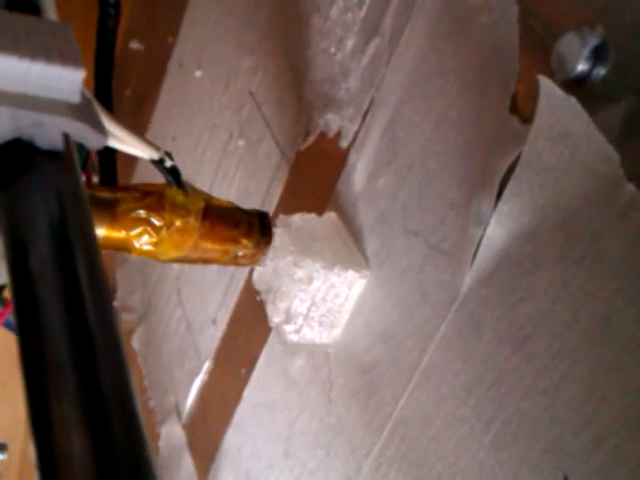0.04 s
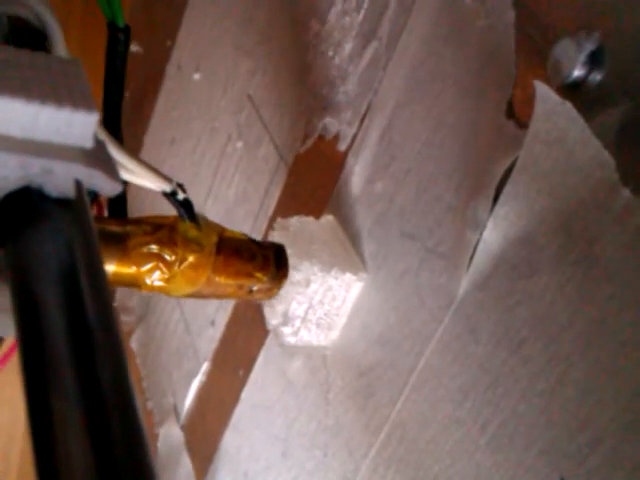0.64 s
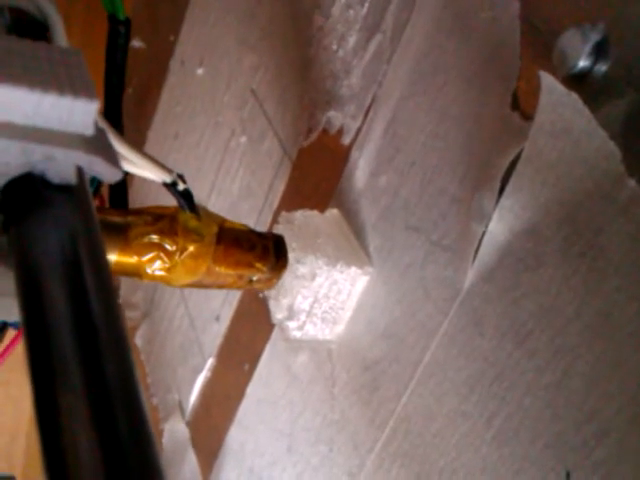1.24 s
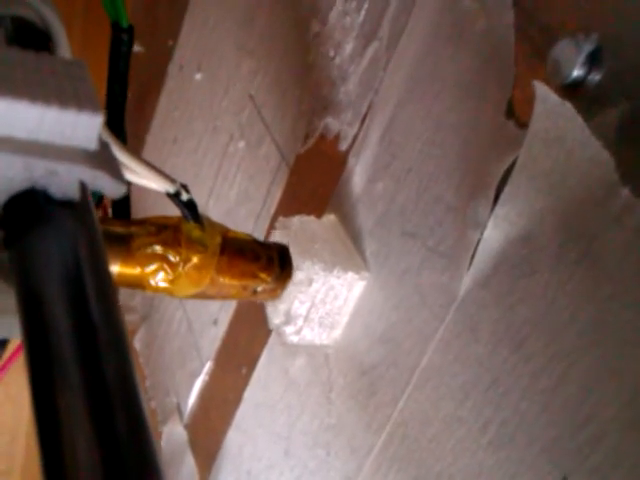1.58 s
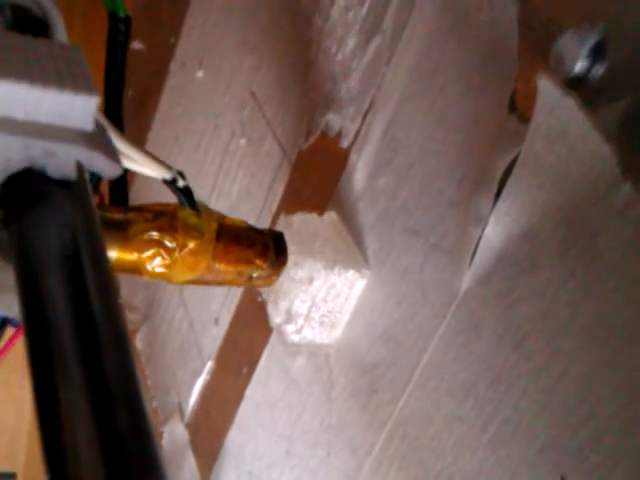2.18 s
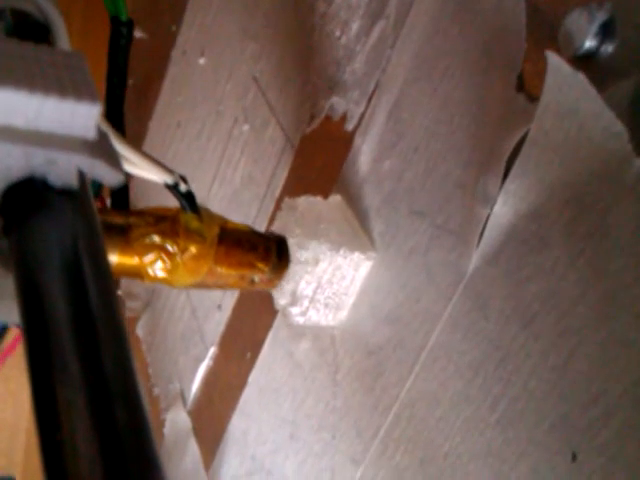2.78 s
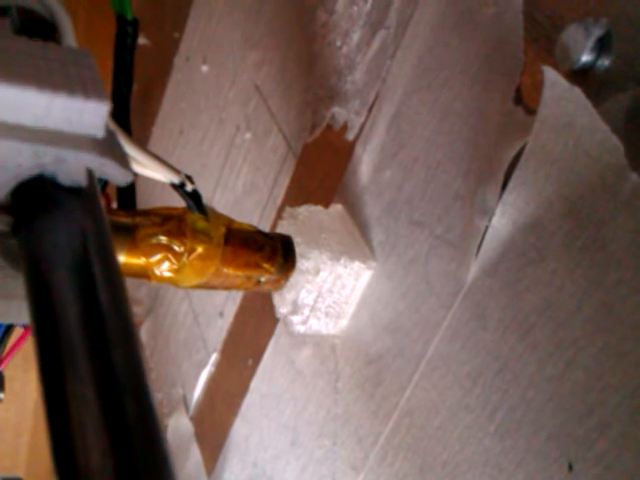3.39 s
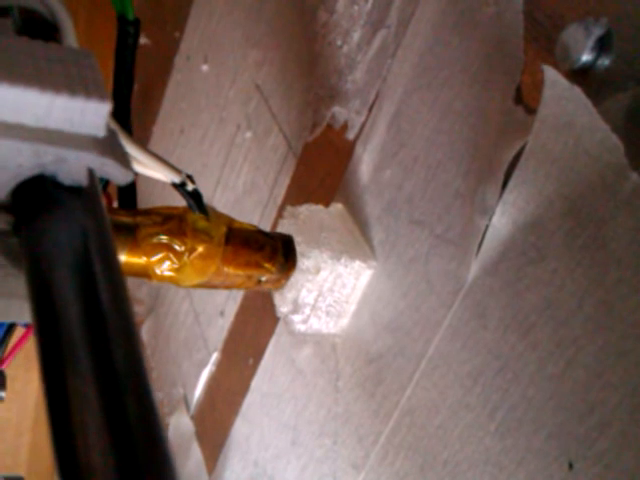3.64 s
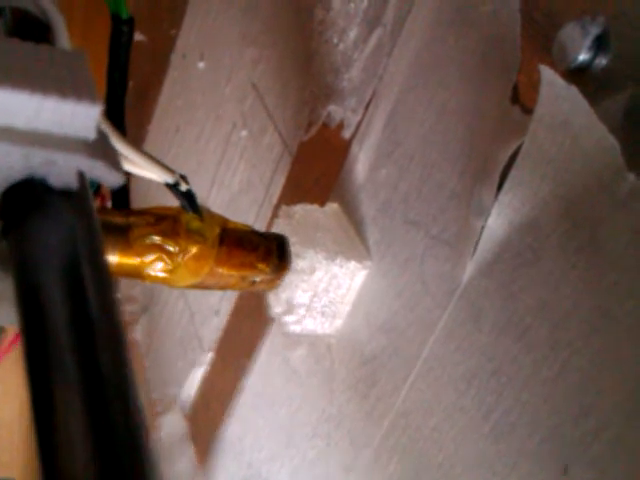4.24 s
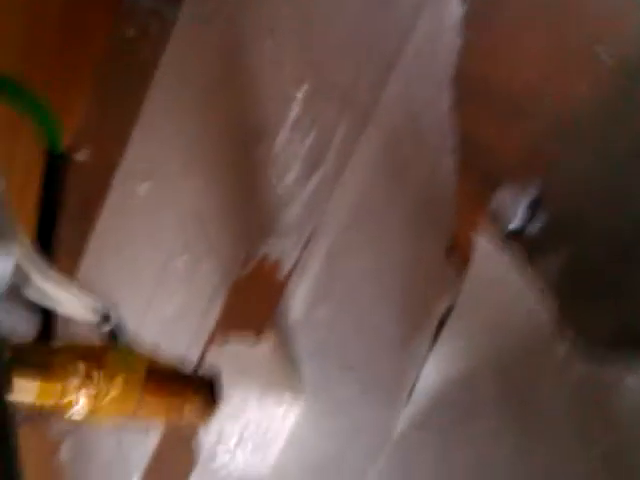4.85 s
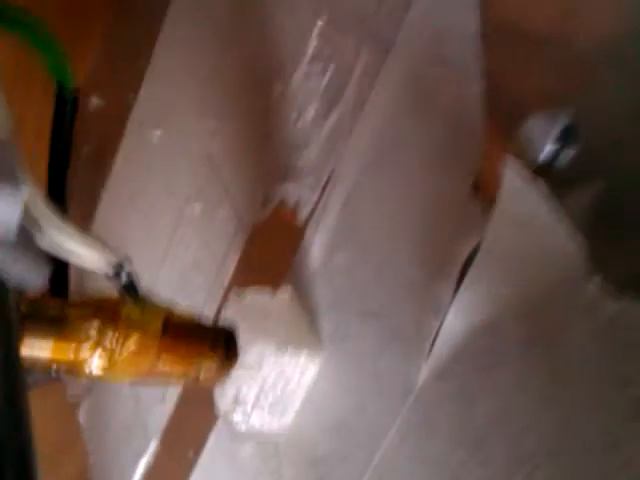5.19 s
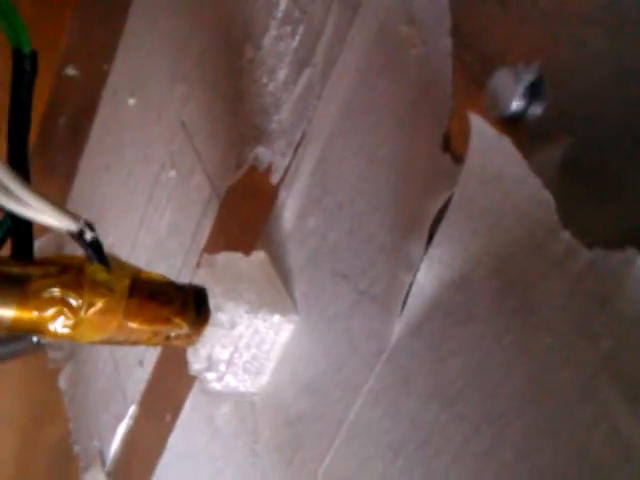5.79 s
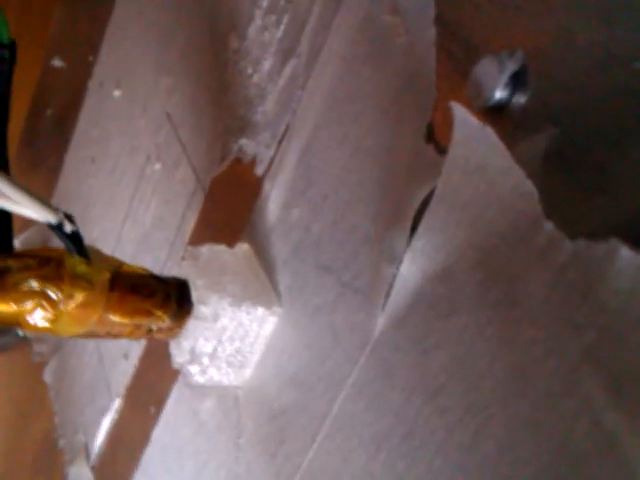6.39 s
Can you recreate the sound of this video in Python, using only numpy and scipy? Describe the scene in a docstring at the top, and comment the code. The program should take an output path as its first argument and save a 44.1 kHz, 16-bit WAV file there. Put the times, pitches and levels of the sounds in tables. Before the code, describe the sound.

Stepper motors pulse and buzz as a 3D printer works, then halt; a hand knocks and rubs the microphone over faint fan hum.

```python
"""Two stepper motors whine and growl in short, jerky moves: a home-built 3D printer filling in a small cube,
heard from beside the nozzle. Every step knocks the frame, the rotors swing about their detents, the bed
rocks, the bearings chatter and a loose part buzzes. The motors stop and leave a fan's hum; then a hand
knocks and rubs the camera as it shifts it, and the hardest knocks clip."""
import sys
import numpy as np
from scipy import signal
from scipy.fft import rfft, irfft, next_fast_len
from scipy.io import wavfile
from scipy.ndimage import uniform_filter1d

SR = 44100
rng = np.random.default_rng(int(sys.argv[2]) if len(sys.argv) > 2 else 0)


def waveform_to_disk(signal):
    """Save audio, clipped to [-1, 1], as 16-bit WAV at the path in sys.argv[1]."""
    frames = np.transpose(np.atleast_2d(signal))
    scaled = np.clip(frames, -1, 1) * 32767
    samples = np.round(scaled).astype(np.int16)
    wavfile.write(sys.argv[1], SR, samples)


N = 282681
TIME = np.arange(N) / SR

# Moves of the print head. Levels in all cue tables are set ahead of each layer's own gain and filters.
# (start [s], end [s], cross-axis step rate [Hz], whining harmonic [number], step force [dB],
#  rotor pitch [Hz], rotor level [dB], bed level [dB], whine level [dB], rasp level [dB], zing level [dB])
HEAD_MOVES = [(0, 0.055, 96.95, 5, -39, 274, -34, -38, -46, -50.5, -57),
              (0.053, 0.099, 97.43, 5, -38, 258, -27, -45, -39, -87, -85),
              (0.1, 0.147, 86.95, 5, -41.5, 286, -31.5, -46, -38.5, -55.5, -62),
              (0.189, 0.249, 156.7, 3, -40, 274, -34.5, -30.5, -40, -52, -53),
              (0.259, 0.314, 156, 3, -39, 286.7, -43, -42, -35, -51, -56),
              (0.296, 0.357, 157.5, 3, -39, 274, -28, -50, -33, -57, -60),
              (0.348, 0.439, 158.6, 3, -41.5, 281.2, -33.5, -33, -39.5, -53.5, -55),
              (0.552, 0.599, 86.3, 5, -40, 255.9, -24, -27.5, -32, -55, -70),
              (0.606, 0.704, 81.83, 6, -36.5, 269.9, -25, -26, -42, -48.5, -57),
              (0.713, 0.808, 105.5, 4, -39, 280.5, -19.5, -39, -52, -86, -72),
              (0.811, 0.898, 81.87, 6, -38.5, 260, -22.5, -24.5, -59, -58.5, -57),
              (0.914, 0.951, 82.65, 6, -39, 270.8, -19.5, -29.5, -35, -57, -83),
              (1.011, 1.04, 86, 5, -42, 262.8, -26.5, -23, -34.5, -57.5, -75),
              (1.347, 1.431, 87.72, 5, -40, 283, -22, -39, -49, -65, -66),
              (1.424, 1.529, 81.96, 6, -37, 275.8, -24, -26.5, -42.5, -48.5, -60),
              (1.525, 1.567, 82.2, 6, -37.5, 268.4, -22, -28, -42, -50.5, -56),
              (1.622, 1.674, 126.9, 3, -39, 277.2, -25, -28, -28.5, -61, -68),
              (1.679, 1.72, 129.2, 3, -38.5, 287.7, -23.5, -28.5, -26, -79, -83),
              (1.724, 1.775, 127.8, 3, -38.5, 282.2, -24, -27.5, -37.5, -56.5, -62),
              (1.775, 1.85, 81.6, 6, -38.5, 277, -21.5, -33.5, -45, -52, -56),
              (1.854, 1.912, 87.35, 5, -41, 266, -25, -35.5, -47, -64, -62),
              (1.913, 1.985, 82.97, 6, -38, 276.3, -26, -31.5, -38, -60, -74),
              (2.046, 2.082, 86.6, 5, -45, 262.8, -26, -24.5, -34.5, -64.5, -78),
              (2.18, 2.282, 96.84, 5, -39.5, 254.1, -25, -38, -33.5, -69, -67.5),
              (2.28, 2.335, 98.25, 5, -39, 268.7, -26.5, -30.5, -40.5, -55, -60),
              (2.336, 2.502, 81.26, 6, -38, 269.6, -26, -33, -41.5, -51.5, -67),
              (2.504, 2.601, 128.1, 3, -37.5, 272.7, -29.5, -32.5, -29.5, -61.5, -63),
              (2.6, 2.694, 127.9, 3, -38, 275.2, -25, -31.5, -27.5, -63, -74),
              (2.739, 2.823, 143.9, 3, -38, 277.9, -23.5, -60, -29, -52, -57),
              (2.823, 2.934, 81.24, 6, -37.5, 267.4, -24, -35, -37, -52, -58),
              (2.937, 3.033, 82.13, 6, -38.5, 275.7, -28, -28, -41.5, -62, -80),
              (3.099, 3.159, 86.8, 5, -39.5, 275, -25, -28.5, -44, -60, -54.5),
              (3.272, 3.325, 86.46, 5, -41.5, 252.9, -29.5, -29, -47, -50.5, -64),
              (3.327, 3.404, 87.2, 5, -37.5, 266.8, -30, -33.5, -35, -52.5, -57.5),
              (3.404, 3.453, 87.3, 5, -43, 268.6, -34, -30.5, -57, -52.5, -65)]
LEAD_STEP_HZ, LEAD_DRIFT = 73.43, .015  # the leading axis: step rate, and its drift as a share


def printer():
    """The steps of two motors drive the whole machine, move by move."""
    (starts, ends, cross_hz, harmonic, force_db, rotor_hz,
     rotor_db, bed_db, whine_db, rasp_db, zing_db) = np.transpose(HEAD_MOVES)
    move = np.searchsorted(starts[1:], TIME)
    zigzag, moving = strokes(starts, ends, move)
    lead, since_step = steps(LEAD_STEP_HZ * (1 + LEAD_DRIFT * walk(9)))
    cross, _ = steps(cross_hz[move])
    force = envelope(starts, ends, force_db, attack=.0043, t60=.0093) * braking(starts, ends)
    whine_gain = envelope(starts, ends, whine_db, attack=.015, t60=.1)
    rotor_gain = envelope(starts, ends, rotor_db, attack=.00073, t60=.29)
    bed_gain = envelope(starts, ends, bed_db, attack=.034, t60=.31)
    rasp_gain = envelope(starts, ends, rasp_db, attack=.0089, t60=.037)
    zing_gain = envelope(starts, ends, zing_db, attack=.02, t60=.14)

    body = frame_knocks(force, lead, cross)
    body += whine_gain * motor_whine(cross_hz[move], harmonic[move])
    body += force * carriage_song(cross_hz[move])
    body += rotor_gain * rotor_swing(zigzag, moving, rotor_hz[move])
    body += bed_gain * bed_rocking()
    grit, growl = bearing_shake(lead + cross, since_step)
    metal = pulley_rasp(grit + growl, zigzag, rasp_gain) + belt_sizzle(grit) + zing_gain * rod_zing()
    return body + metal + bearing_chatter(grit, growl, force, zigzag)


def steps(hz, jitter_cycles=.012, scatter_db=1.5):
    """One uneven impulse per step, and the seconds since the last step."""
    cycles = np.cumsum(hz) / SR + jitter_cycles * walk(70)
    fired = np.diff(np.floor(cycles), prepend=0) > 0
    impulses = fired * undb(scatter_db * rng.standard_normal(N))
    return unit(impulses - hz / SR), cycles % 1 / hz


def strokes(starts, ends, move, stroke_s=.051):
    """Speed of the head along its zigzag, -1 to 1, and whether it is still moving."""
    lengths = np.minimum(ends, np.append(starts[1:], np.inf)) - starts
    progress = np.clip((TIME - starts[move]) / lengths[move], 0, 1)
    count = np.maximum(np.round(lengths / stroke_s), 1)
    return np.sin(np.pi * count[move] * progress), progress < 1


def throb(zigzag, turn_db):
    """Gain that swells in mid-stroke and dips as the head slows at each turn."""
    return undb(turn_db) + (1 - undb(turn_db)) * abs(zigzag)


def braking(starts, ends, surge_db=3, early_s=.032, width_s=.0091, min_pause_s=.025):
    """Gain of the short surge of force as the head brakes before each stop."""
    stops = ends[np.append(starts[1:], np.inf) - ends > min_pause_s]
    return undb(surge_db * sum(np.exp(-((TIME - stop + early_s) / width_s) ** 2) for stop in stops))


# The frame's resonances: (frequency [Hz], t60 [s], level [dB])
FRAME_MODES = [(72.2, 0.38, 5), (206.6, 0.22, 9), (227.5, 0.93, 8.5), (246.7, 0.26, 18.5),
               (302.4, 0.17, 12), (374.3, 0.54, 2.5), (422, 0.25, -6.5), (496, 0.082, -14.5),
               (760, 0.29, -6), (800, 0.28, -8.5)]
# Tone of the panels' dense ringing: (frequency [Hz], level [dB])
PANEL_EQ = [(25, -35), (65, -13.5), (110, -9.5), (155, -8), (195, 8), (270, -0.5), (380, 4.5), (500, 5.5),
            (600, -3), (900, -17), (1250, -12), (2000, -24.5), (3000, -43.5), (6000, -64.5), (16000, -72.5)]


def frame_knocks(force, lead, cross):
    """Each step rings the frame and panels, and the whole machine shudders on the bench."""
    kicks = force * (lead + undb(-4.5) * cross)
    frame = undb(21.5) * ring(kicks, FRAME_MODES)
    panels = undb(18.5) * colour(diffuse(kicks, t60=.19), PANEL_EQ)
    shudder = noise([(15, -5.5), (35, -5), (70, 4), (110, 9.5), (160, -15.5), (300, -19.5), (2000, -77)])
    return frame + panels + undb(.5) * force * shudder


def motor_whine(step_hz, harmonic):
    """In each move one harmonic of the steps meets a resonance and sings out."""
    return undb(-1.25 + 2.5 * walk(50)) * tone(step_hz * harmonic, wander_hz=6.54, rate=55)


def carriage_song(step_hz, resonance_hz=792):
    """The carriage sings along on the step harmonic nearest its resonance."""
    hz = step_hz * np.round(resonance_hz / step_hz)
    return undb(-13 + 4.6 * walk(30.33)) * tone(hz, wander_hz=4.5, rate=45)


ROTOR_REST_HZ = 281.3  # pitch of the swing without load


def rotor_swing(zigzag, moving, swing_hz, sag_hz=12.1, direction_hz=3.99, lag_s=.0062):
    """The rotor overshoots each detent: a tone that swells and sags under load in mid-stroke."""
    loaded_hz = swing_hz - sag_hz * (abs(zigzag) - np.pi / 4) + direction_hz * zigzag
    lag = np.exp(-1 / (lag_s * SR))
    hz = ROTOR_REST_HZ + signal.lfilter([1 - lag], [1, -lag], moving * (loaded_hz - ROTOR_REST_HZ))
    return tone(hz, wander_hz=6.54, rate=42) * undb(4.5 + 1.3 * walk(70)) * throb(zigzag, turn_db=-10)


def bed_rocking():
    """The bed rocks on its springs with a low, uneven drone."""
    return undb(1.3 * walk(40)) * tone(hz=116, wander_hz=4.42, rate=37)


def bearing_shake(impulses, since_step):
    """Two textures of shaken bearings: loose grit, hardest just after a step, and a pitched growl."""
    grit = rng.standard_normal(N) * (fade(since_step, t60=.05) + .8) * undb(2.2 * walk(90))
    growl = colour(diffuse(impulses, t60=.06), [(150, -20), (500, 0)])
    return unit(grit), unit(growl)


# Ring of the steel rods and pulleys: (frequency [Hz], t60 [s], level [dB])
ROD_MODES = [(704, .15, 4), (1020, .12, 1), (1168, .18, -2), (1335, .25, 7), (1497, .2, 4), (1565, .15, 6),
             (1624, .1, 4), (1760, .25, 6), (1840, .08, 4), (1983, .2, 5), (2223, .2, 6), (2479, .15, 2),
             (2720, .08, 3), (3036, .15, 5), (4850, .03, 6), (5010, .03, 7), (6150, .008, 2),
             (8000, .012, 7), (12620, .012, 19)]
# Tone of the bearing chatter: (frequency [Hz], level [dB])
CHATTER_EQ = [(200, -1), (420, 22.5), (600, 5.5), (800, 8.5), (1150, -5), (1700, -1.5), (2100, -10.5),
              (2600, -9.5), (3600, -14.5), (4500, -26.5), (8000, -73.5)]


def bearing_chatter(grit, growl, force, zigzag):
    """The bearings rattle with the force of the steps, and the rods ring on."""
    rattle = (undb(-2.5) * grit + undb(-4) * growl) * force * throb(zigzag, turn_db=-3)
    chatter = undb(3) * colour(rattle + ring(rattle, ROD_MODES), CHATTER_EQ)
    return chatter + undb(-26) * diffuse(chatter, t60=.23)


# Bright edge of the pulleys: (frequency [Hz], level [dB])
PULLEY_EQ = [(2600, -30), (3600, -2), (4400, -8), (4750, 2), (4950, 3), (5200, 2), (5500, -8), (6200, -3),
             (7200, -22), (7900, -11), (8400, -9), (9300, -30), (10000, -42), (12600, -23), (16000, -38)]


def pulley_rasp(shake, zigzag, gain):
    """The pulleys add a metallic rasp that comes and goes with each stroke."""
    scuff = unit(shake) * throb(zigzag, turn_db=-5) * gain
    return undb(4) * colour(scuff + ring(scuff, ROD_MODES), PULLEY_EQ)


# Hard pulls on a belt: (start [s], end [s], level [dB])
BELT_PULLS = [(0, .055, -59), (0.108, .125, -61), (0.2, .228, -56), (.228, .29, -66), (0.338, .432, -61),
              (0.571, .59, -64), (.612, .7, -69), (1.43, 1.511, -65), (2.33, 2.371, -76),
              (2.43, 2.497, -72), (2.775, 2.818, -69), (3.289, 3.31, -55), (3.351, 3.385, -65),
              (3.408, 3.445, -57.5)]
# The belt's fizzy top end: (frequency [Hz], level [dB])
BELT_EQ = [(5000, -25), (6700, -2), (7300, -6), (7900, 6), (8400, 6), (9400, -2), (10100, -8), (11300, -1),
           (12100, -3), (12650, 7), (13300, -4), (14500, -1), (16000, -4)]


def belt_sizzle(grit):
    """A hard pull makes a belt sizzle on its pulley."""
    return unit(colour(grit, BELT_EQ)) * envelope(*np.transpose(BELT_PULLS), attack=.01, t60=.03)


def rod_zing(hz=3585):
    """One guide rod rings in a thin, narrow band of noise."""
    band = [(3000, -40), (3440, -13), (hz - 35, 0), (hz + 35, 0), (3740, -13), (4300, -40)]
    return undb(-4.5) * noise(band)


# Spurts of buzzing against the frame: (centre time [s], length [s], level [dB], peak frequency [Hz])
BUZZ_SPURTS = [(0.655, 0.012, -44.5, 1496), (0.69, 0.02, -40, 1903), (0.743, 0.016, -49, 1601),
               (0.844, 0.017, -38.5, 2280), (0.887, 0.016, -40.5, 1679), (1.41, 0.019, -37.5, 1590),
               (1.55, 0.025, -42, 1708), (1.66, 0.033, -44.5, 1896), (1.752, 0.019, -50, 3205),
               (1.969, 0.034, -53, 1999), (2.063, 0.012, -43, 1200), (2.205, .012, -38.5, 1302),
               (2.42, 0.015, -47, 1798), (2.536, 0.036, -40, 2101), (2.577, 0.022, -42, 1904),
               (2.681, 0.026, -37, 1689), (2.996, 0.02, -39, 2100), (3.012, 0.014, -41.5, 1694)]


def loose_part():
    """A loose part taps the frame at the rotor's resting pitch, in gritty bursts that ring the rods."""
    _, since_tap = steps(np.full(N, ROTOR_REST_HZ), jitter_cycles=.098, scatter_db=0)
    taps = unit(fade(since_tap, t60=.014) * grains(per_second=9000, spread_db=8))
    buzz = np.zeros(N)
    for centre, length, db, hz in BUZZ_SPURTS:
        at = int((centre - .06) * SR) + np.arange(SR // 8)
        eq = [(hz / 4, -12), (hz * .6, -1), (hz, 0), (hz * 1.5, -9),
              (5500, -17), (7500, -34), (16000, -48)]
        swell = np.exp(-(2 * (TIME[at] - centre) / length) ** 2)
        buzz[at] += undb(db) * unit(colour(taps[at], eq)) * swell
    return undb(-3.5) * (buzz + undb(-15) * ring(buzz, ROD_MODES))


def handling():
    """A hand shifts the camera, right at the microphone; the room answers the sharper sounds faintly."""
    rubs = finger_rubs()
    grip = grip_rumble() + hand_creaks()
    close = knocks() + fingertip_squeak() + rubs
    return close + undb(-24) * diffuse(close, t60=.46) + grip + palm_brushes()


# Knocks on the camera: (time [s], jolt level [dB], jolt decay [s], jolt edge [s],
#  ring level [dB], ring pitch [Hz], crack level [dB])
CAMERA_KNOCKS = [(4.149, -32.5, .0019, 0.00062, -56, 520, -68),
                 (4.177, -26.5, 0.0026, .00068, -40, 490, -72),
                 (4.348, -32, .0004, 0.000036, -48, 1500, -36),
                 (4.3528, -16.5, 0.0048, .00007, -38, 620, -35),
                 (4.3718, -22, .001, 0.00014, -35, 624, -62), (4.376, -8.5, 0.0032, 0.0018, -50, 493, -70),
                 (4.4264, -0.5, 0.0013, 0.00017, -6, 640, -48), (4.4286, -4, 0.0021, 0.0007, -22, 470, -60),
                 (4.4963, -19, 0.0043, .0008, -7.5, 378, -45), (4.536, -31, .002, .0003, -21, 800, -24),
                 (4.612, -35, .001, .00006, -30, 1550, -22), (4.625, -27, .002, .0003, -23, 1480, -22),
                 (4.633, -30, .0018, .0001, -20, 1700, -24), (4.6608, -20, .001, .00003, -30, 694, -36),
                 (4.6745, -26, .002, .0001, -18, 900, -38), (4.6822, -21, 0.0011, .00004, 2.5, 560, -19),
                 (4.6868, -5.5, 0.0044, 0.00038, -6, 905, -28),
                 (4.7053, -15, .001, 0.000066, -11, 1140, -14),
                 (4.7118, -19, 0.0024, 0.00039, -18, 700, -30), (4.718, 0.5, 0.0044, 0.0018, -26, 396, -44),
                 (4.745, -25, .002, .0003, -16, 1350, -28), (4.865, -58, .002, .0005, -44, 1020, -60),
                 (5.622, -58, .002, .0005, -40, 810, -64)]
# Body of a knock through the case: (frequency [Hz], level [dB])
THUMP_EQ = [(15, -14.5), (40, -4.5), (90, 1), (200, -1), (450, 1), (1000, -1), (3500, 1.5), (6500, -14),
            (16000, -24)]
# Bite of its dry crack: (frequency [Hz], level [dB])
CRACK_EQ = [(100, -11), (1300, 7.5), (2600, 2.5), (4000, -9), (9000, -22), (16000, -39)]


def knocks(ring_cycles=5.7):
    """Each knock presses the case and lets go: a two-sided jolt, a short ring and a dry crack."""
    thumps, crack_gain = np.zeros(N), np.zeros(N)
    pre_roll = SR // 20
    t = TIME[:SR // 5] - TIME[pre_roll]
    for time, jolt_db, decay, edge, ring_db, hz, crack_db in CAMERA_KNOCKS:
        at = int(time * SR) - pre_roll + np.arange(len(t))
        jolt = -np.tanh(t / edge) * np.exp(-abs(t) / decay)
        ringing = -np.sin(2 * np.pi * hz * t) * fade(t, ring_cycles / hz) * (1 - fade(t, 1 / hz))
        thumps[at] += undb(jolt_db) * jolt + undb(ring_db) * ringing
        crack_gain[at] += undb(crack_db) * fade(t, t60=.019)
    cracks = crack_gain * rng.standard_normal(N)
    return undb(-1.5) * colour(thumps, THUMP_EQ) + undb(3) * colour(cracks, CRACK_EQ)


# Finger slides: (start [s], end [s], attack [s], rumble level [dB], scrape level [dB], hiss level [dB])
FINGER_RUBS = [(4.437, 4.527, 0.058, -18, -33, -39.5), (4.51, 4.546, .0035, -22.5, -27.5, -37),
               (4.51, 4.53, .002, -30, -33, -35), (4.531, 4.611, .0073, -33, -36, -42.5),
               (4.605, 4.64, .032, -42, -30.5, -38), (4.659, 4.684, 0.0016, -29, -37, -33),
               (4.676, 4.709, 0.0045, -10, -20, -44), (4.705, 4.714, .004, -16, -32, -49),
               (4.743, 4.751, .002, -38, -30, -62)]
# Resonances of the camera's case: (frequency [Hz], t60 [s], level [dB])
CASE_MODES = [(697, 0.041, -12), (1500, 0.03, -4), (1730, 0.026, 16), (2550, 0.026, 7), (2980, 0.013, 5),
              (5360, .01, 11)]
# Midrange scrape of skin: (frequency [Hz], level [dB])
SCRAPE_EQ = [(150, -16), (280, -11), (700, 0), (1000, -8.5), (1700, -13), (2900, -19), (4500, -18.5),
             (9000, -68)]
# The hiss on top of it: (frequency [Hz], level [dB])
HISS_EQ = [(1500, 6), (2600, 6), (4000, 6.5), (7500, -1), (11000, -8), (16000, -5.5)]


def finger_rubs():
    """Skin sticks and slips on the case: a grainy scrape with a bright hiss."""
    starts, ends, attacks, _, scrape_db, hiss_db = np.transpose(FINGER_RUBS)
    slips = undb(2.8 * walk(450)) * grains(per_second=9000, spread_db=9)
    scrape = unit(colour(slips + ring(slips, CASE_MODES), SCRAPE_EQ))
    scrape *= envelope(starts, ends, scrape_db, attacks, t60=.044)
    hiss = unit(colour(slips, HISS_EQ)) * envelope(starts, ends, hiss_db, attacks, t60=.0076)
    return undb(-3.5) * scrape + undb(1.5) * hiss


# Squeezes of the grip: (start [s], end [s], level [dB])
GRIP_SQUEEZES = [(4.12, 4.363, -50.5), (4.382, 4.507, -29.5), (4.65, 4.712, -18.5)]


def grip_rumble(hold_db=-65):
    """The case rumbles as the grip flexes it and the fingers slide, then faintly as the hand holds on."""
    starts, ends, attacks, rumble_db, _, _ = np.transpose(FINGER_RUBS)
    squeezing = envelope(*np.transpose(GRIP_SQUEEZES), attack=.051, t60=.15)
    sliding = undb(-11.5) * envelope(starts, ends, rumble_db, attacks, t60=.051)
    holding = undb(hold_db) * (TIME > ends[-1])
    rumble = noise([(12, -14), (30, 11.5), (80, -2), (160, -8), (400, -8), (1200, -41), (5000, -81)])
    return (squeezing + sliding + holding) * rumble


def fingertip_squeak(time_s=4.705, width_s=.0027, hz=1145, db=-11.5):
    """Fast stick and slip of a fingertip: a short rough tone with an overtone."""
    phase = 2 * np.pi * np.cumsum(hz * (1 + .0496 * walk(600))) / SR
    squeak = unit(np.sin(phase) + undb(-17) * np.sin(2 * phase))
    return undb(db) * squeak * np.exp(-((TIME - time_s) / width_s) ** 2)


# Creaks in the hand: (time [s], level [dB], peak frequency [Hz], length [s])
HAND_CREAKS = [(4.736, -40, 775, 0.022), (4.86, -50, 980, 0.0096), (5.345, -59, 70, 0.028),
               (5.612, -52, 825, 0.028), (5.99, -57, 1190, 0.02), (6.394, -44, 365, 0.022)]


def hand_creaks():
    """Faint creaks, each a band of noise that swells quickly and dies away."""
    creaks = np.zeros(N)
    for time, db, hz, length in HAND_CREAKS:
        age = np.maximum(TIME - time, 0) / length * 2
        band = noise([(hz / 4, -14), (hz, 0), (hz * 1.38, -9), (hz * 8, -42)])
        creaks += undb(db) * age * np.exp(1 - age) * band
    return creaks


# Light touches of the palm: (start [s], end [s], attack [s], level [dB], peak frequency [Hz])
PALM_BRUSHES = [(4.882, 4.96, .04, -68, 1750), (4.9, 4.96, 0.028, -67, 4600), (5.36, 6.1, .07, -69.5, 1930),
                (6.385, 6.41, .01, -66, 4400)]


def palm_brushes():
    """The palm swishes softly over the case, each time a wavering band of noise."""
    swishes = np.zeros(N)
    for start, end, attack, db, hz in PALM_BRUSHES:
        gain = envelope([start], [end], [db], attack, t60=.25) * undb(1.2 * walk(16))
        swishes += gain * noise([(hz / 3, -28), (hz * .71, -7), (hz, 0), (hz * 1.13, -4), (hz * 2, -26)])
    return swishes


# Fan air and room tone before the camera turns: (frequency [Hz], level [dB per Hz])
AIR_BEFORE_TURN = [(12, -82), (30, -77), (90, -78), (150, -85), (280, -85), (400, -91), (600, -97),
                   (1350, -99), (2500, -105), (4000, -107), (14000, -110)]
# The same air after the turn: (frequency [Hz], level [dB per Hz])
AIR_AFTER_TURN = [(12, -66), (30, -92), (90, -79.5), (150, -85.5), (280, -81), (600, -89.5), (850, -91.5),
                  (1080, -95), (1350, -90.5), (1600, -100), (2050, -102), (2600, -105), (8000, -108),
                  (14000, -110)]
# Fan, mains and motor driver tones: (frequency [Hz], level before the turn [dB], level after it [dB])
HUM_TONES = [(59.2, -65, -72), (118.4, -62, -63), (204.6, -76, -69), (236.9, -69, -68), (263.8, -67, -62),
             (436, -80, -71), (737.5, -85, -77), (893.6, -86, -76), (1330, -85, -72), (1428, -86, -77),
             (11542, -81, -81)]


def fan(turn_s=(4.5, 4.8)):
    """Steady air noise and wavering tones; the midrange opens up once the camera has turned."""
    turned = np.interp(TIME, turn_s, [0, 1])
    white = np.sqrt(SR / 2) * rng.standard_normal(N)  # 0 dB per Hz
    air = (1 - turned) * colour(white, AIR_BEFORE_TURN) + turned * colour(white, AIR_AFTER_TURN)
    hum = sum(undb(before + turned * (after - before)) * tone(hz, wander_hz=1.1, rate=17)
              for hz, before, after in HUM_TONES)
    return air * undb(.5 * walk(16)) + hum


def undb(db):
    """Decibels to gain."""
    return 10 ** (np.asarray(db) / 20)


def unit(x):
    """Scale to rms 1."""
    return x / np.sqrt(np.mean(x ** 2))


def colour(x, points):
    """Minimum-phase EQ through the (frequency [Hz], level [dB]) points."""
    hz, db = np.transpose(points)
    size = next_fast_len(len(x) + 8192) * 2
    bin_hz = np.arange(size // 2 + 1) * SR / size
    response = undb(np.interp(np.log(bin_hz + 1), np.log(hz), db))
    cepstrum = irfft(np.log(response))
    cepstrum[1:size // 2] *= 2  # folded forward, so nothing rings ahead of a hit
    cepstrum[size // 2 + 1:] = 0
    return irfft(rfft(x, size) * np.exp(rfft(cepstrum)))[:len(x)]


def noise(points):
    """Coloured noise of rms 1."""
    return unit(colour(rng.standard_normal(N), points))


def walk(rate):
    """Smooth random drift of rms 1, with `rate` new values a second."""
    hold = int(SR / rate)
    stairs = np.repeat(rng.standard_normal(N // hold + 1), hold)[:N]
    return unit(uniform_filter1d(uniform_filter1d(stairs, hold), hold))


def tone(hz, wander_hz, rate):
    """A sine of rms 1 whose pitch wanders."""
    return np.sqrt(2) * np.sin(2 * np.pi * np.cumsum(hz + wander_hz * walk(rate)) / SR)


def grains(per_second, spread_db):
    """Tiny clicks of uneven size at random moments; rms 1."""
    clicks = (rng.random(N) < per_second / SR) * rng.choice([-1, 1], N)
    return unit(clicks * undb(spread_db * rng.uniform(-.75, 1, N)))


def fade(t, t60):
    """Exponential decay that starts at t = 0."""
    return (t >= 0) * np.exp(-np.log(1000) * np.maximum(t, 0) / t60)


def envelope(starts, ends, dbs, attack, t60):
    """Gain of a row of gestures: each rises, holds its level and dies away."""
    gain = np.zeros(N)
    for start, end, db, rise in zip(starts, ends, dbs, np.broadcast_to(attack, len(starts))):
        span = slice(max(int(start * SR), 0), int((end + 2 * t60) * SR))
        t = TIME[span]
        shape = np.clip((t - start) / rise, 0, 1) * fade(np.maximum(t - end, 0), t60)
        gain[span] = np.maximum(gain[span], undb(db) * shape)
    return gain


def ring(x, modes):
    """Damped resonances, each with the given gain at its centre."""
    out = 0
    for hz, t60, db in modes:
        pole = np.exp((2j * np.pi * hz - np.log(1000) / t60) / SR)
        out = out + 2 * (1 - abs(pole)) * undb(db) * signal.lfilter([1], [1, -pole], x + 1e-18).imag
    return out


def diffuse(x, t60):
    """Smear a sound with a dense decaying tail of equal energy."""
    t = TIME[:SR // 2]
    tail = rng.standard_normal(len(t)) * fade(t, t60)
    return signal.fftconvolve(x, tail / np.linalg.norm(tail))[:N]


def scene():
    """Printer, hand and fan at one microphone."""
    return (printer() + loose_part() + handling() + fan())[None]


def record(dry):
    """The camera clips the hardest knocks and cuts the top."""
    ceiling, top_hz = .7, 15900
    lowpass = signal.ellip(10, .2, 80, top_hz, fs=SR, output="sos")
    return signal.sosfilt(lowpass, np.clip(dry, -ceiling, ceiling))


dry = scene()
out = record(dry)
waveform_to_disk(out)
```